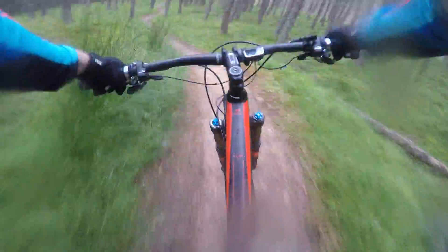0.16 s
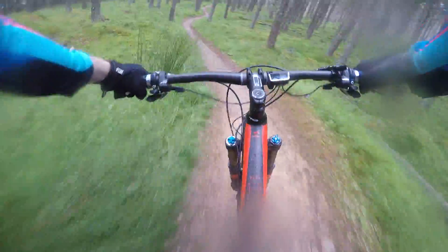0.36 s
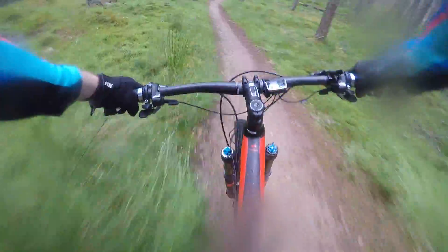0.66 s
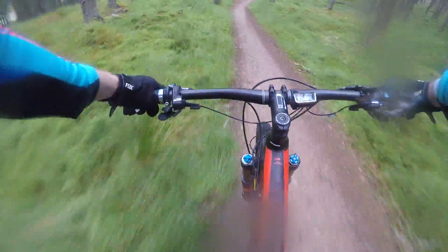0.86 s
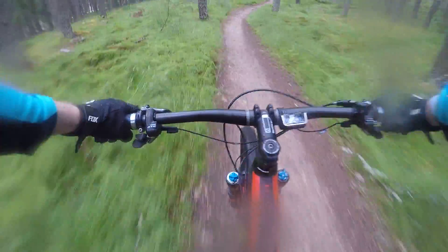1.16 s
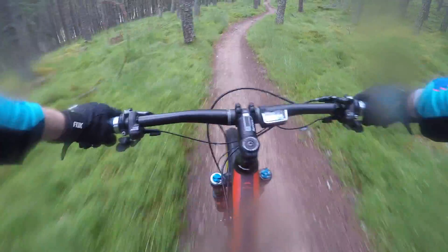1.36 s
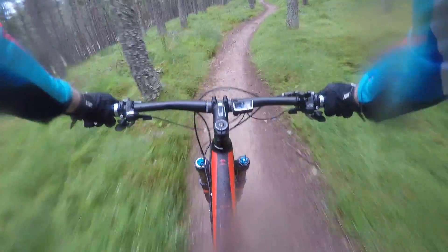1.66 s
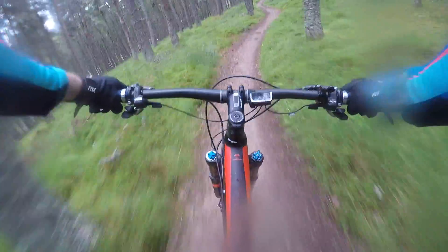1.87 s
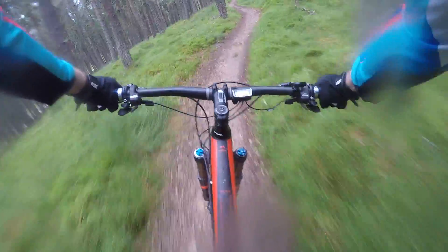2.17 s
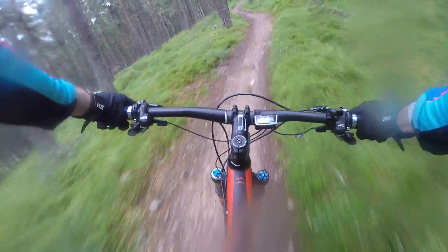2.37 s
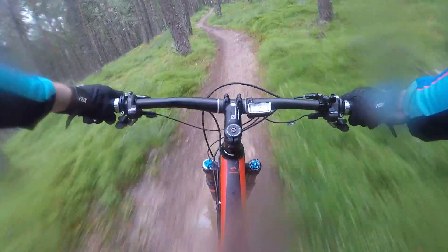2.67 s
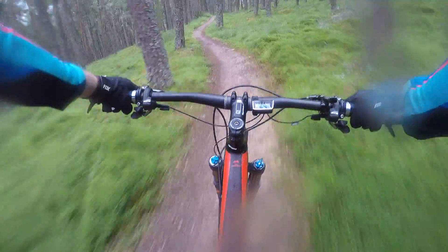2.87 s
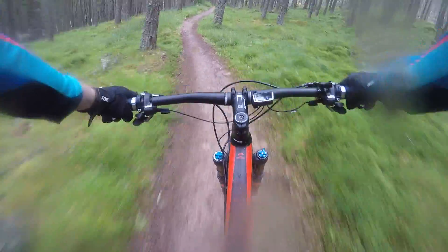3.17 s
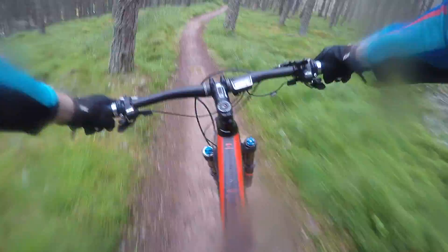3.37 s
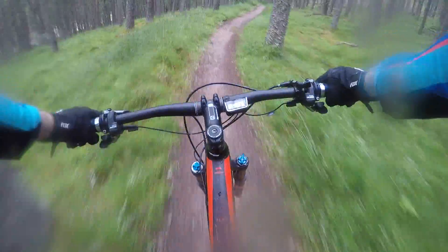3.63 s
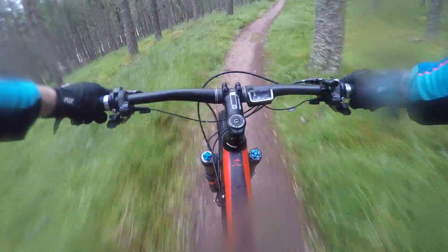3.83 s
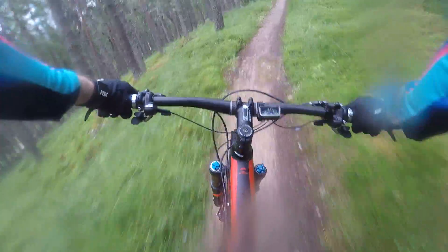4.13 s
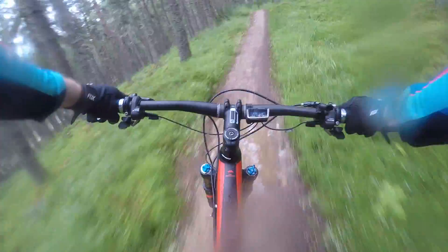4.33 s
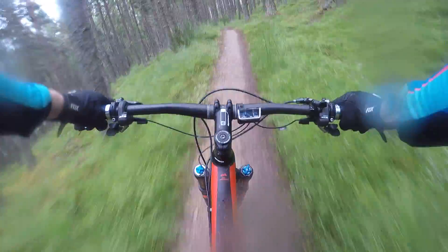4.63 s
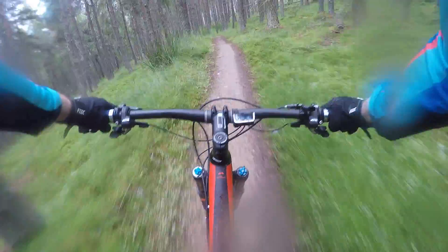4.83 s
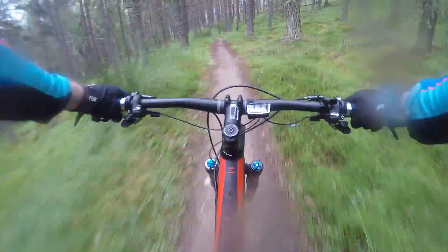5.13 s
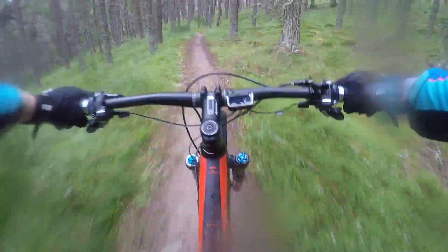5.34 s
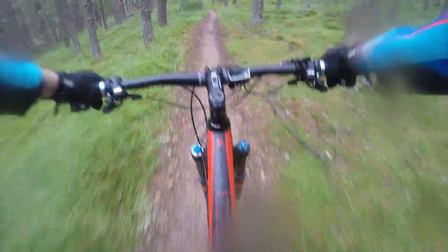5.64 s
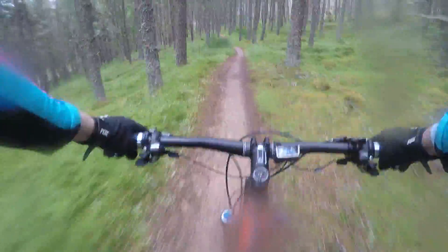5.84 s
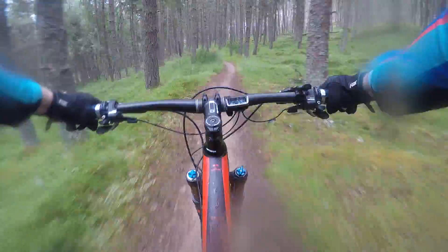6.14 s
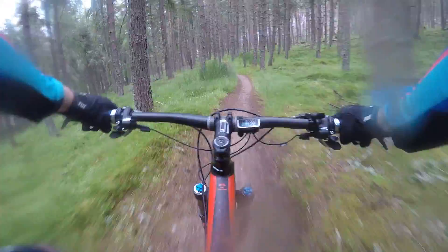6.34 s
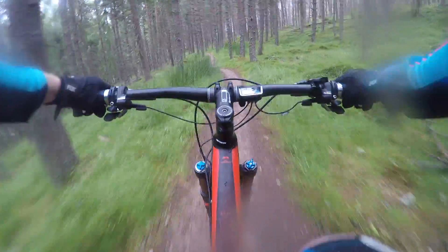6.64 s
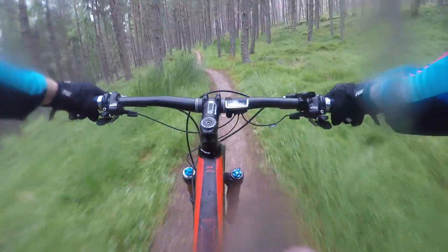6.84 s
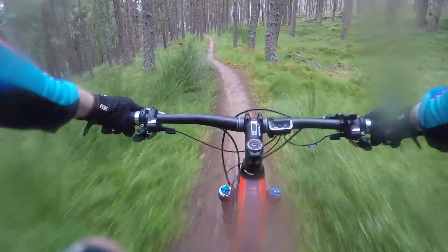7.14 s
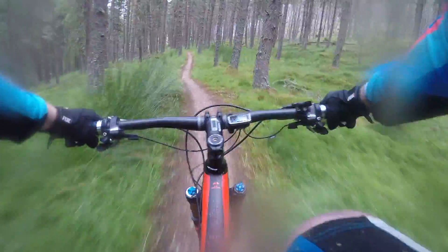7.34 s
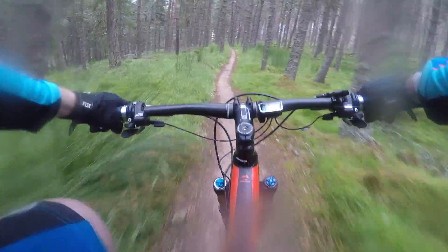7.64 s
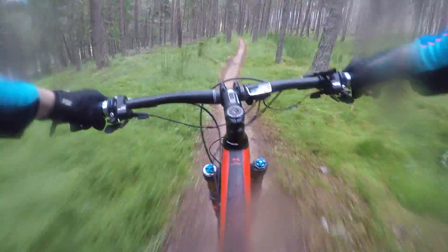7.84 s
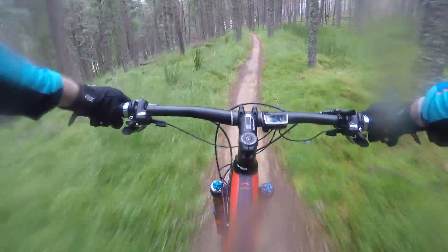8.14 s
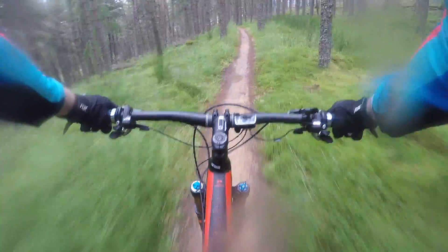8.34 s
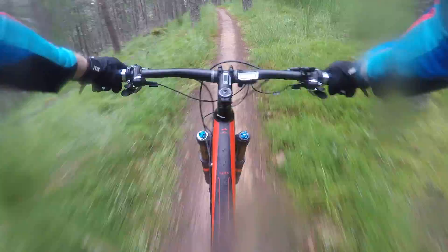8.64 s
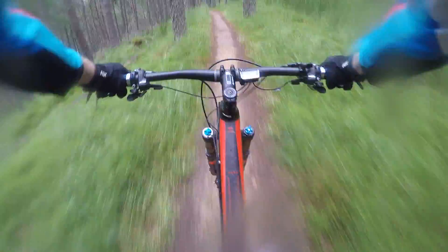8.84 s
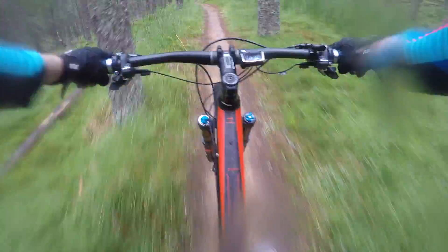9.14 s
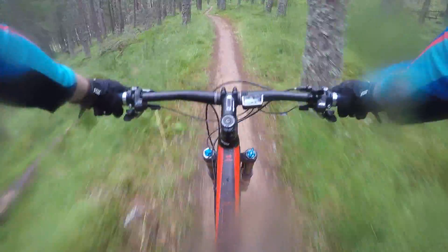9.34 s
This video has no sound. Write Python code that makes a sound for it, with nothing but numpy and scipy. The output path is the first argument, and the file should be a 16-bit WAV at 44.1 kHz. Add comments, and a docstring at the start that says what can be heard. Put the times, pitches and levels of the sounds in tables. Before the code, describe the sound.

A mountain bike races down a dirt trail, heard from the rider's chest: deep jolts and thumps, crunching tyre grit, plastic knocks and ticks.

```python
"""Low jolts and shudder, crunching grit, knocks and ticks: a mountain bike runs down a dirt trail, heard in a
closed plastic housing on the rider's chest. Jolts are swells of a wandering low sine, heave and shudder are low
noise, deep thumps and heartbeats are short falling tones. Tyre grit, fabric and stones are random clicks through
the resonances of the shell; knocks, ticks and pebbles strike its modes directly. A faint whistle enters late."""
import sys
import numpy as np
from scipy import signal
from scipy.fft import rfft, irfft
from scipy.io import wavfile
from scipy.ndimage import uniform_filter1d

SR = 44100
rng = np.random.default_rng(int(sys.argv[2]) if len(sys.argv) > 2 else 0)


def master(y):
    """Save y as 16-bit WAV."""
    cut = np.clip(np.atleast_2d(y).T, -1, 1)
    pcm = np.round(cut * 32767)  # scale
    wavfile.write(sys.argv[1], SR, pcm.astype(np.int16))


N = 418950

# Jolts over bumps. Each row: middle in seconds, peak in dB, half length of the swell in seconds.
JOLTS = [(0.232, -8, 0.04), (0.315, -13, 0.065), (0.377, -14, 0.054), (0.718, -15.5, 0.055),
         (1.107, -22.5, 0.048), (1.372, -25, 0.083), (2.312, -20.5, 0.29), (3.024, -17.5, 0.057),
         (3.474, -13, 0.058), (3.591, -10, 0.084), (4.565, -15.5, 0.13), (4.877, -20, 0.17),
         (5.21, -20.5, 0.091), (5.797, -17, 0.034), (5.918, -13, 0.096), (6.109, -17, 0.063),
         (6.826, -27, 0.25), (7.17, -12, 0.071), (7.907, -12.5, 0.098), (8.207, -14.5, 0.091),
         (8.42, -18, 0.11), (8.552, -16.5, 0.023), (8.713, -14, 0.033), (8.846, -8.5, 0.05)]
# Slow heave of the chest against the microphone. Each row: time in seconds, level in dB ahead of the strap.
HEAVE_LEVEL = [(0.0, -28.5), (0.55, -25.5), (1.0, -34), (1.55, -31.5), (1.78, -21), (2.55, -21),
               (2.76, -28.5), (3.3, -26), (3.8, -29.5), (4.3, -21), (4.8, -30.5), (5.3, -32.5), (5.44, -39),
               (5.72, -36.5), (6.3, -25.5), (6.7, -31.5), (7.4, -22), (8.3, -22.5), (8.95, -25),
               (9.33, -32.5), (9.5, -26.5)]
# Spectrum of the heave. Each row: frequency in Hz, relative density in dB per Hz.
HEAVE_SPECTRUM = [(4.7, -17), (10.0, -1), (16, 5.5), (21, 10), (27, 5.5), (32, 0.5), (43, -6), (55, -8.5),
                  (70, -45), (99, -120)]
# Louder, deeper low thumps: some fall on the pulse's beats, others between them.
# Each row: middle in seconds, peak in dB.
THUMPS = [(0.126, -24.5), (0.227, -20), (0.697, -17.5), (1.072, -23), (1.48, -21), (3.603, -24.5),
          (4.925, -24), (6.082, -25), (7.607, -18.5), (7.968, -26), (8.366, -18.5), (8.83, -23.5),
          (9.286, -30)]
# Strength of each pulse beat in turn: peak in dB.
PULSE_PEAK_DB = [-26, -25, -31, -33.5, -29, -29, -25, -26.5, -30, -34, -24.5, -26, -27, -27.5, -28.5, -26.5,
                 -26.5, -28, -32, -31, -24, -30, -27, -31]
# Tyres on dirt, levels before their wavering. Each row: time in seconds, grit through the shell in dB,
# airborne hiss in dB, roar in dB, shudder of the frame in dB.
ROLL = [(0.0, -49, -62, -51.5, -39.5), (0.18, -46.5, -63.5, -51.5, -43.5), (0.5, -50.5, -66, -57.5, -45.5),
        (1.24, -46.5, -62, -55, -44.5), (1.53, -46.5, -64.5, -54, -42.5), (2.12, -45.5, -65.5, -53, -45.5),
        (2.67, -44.5, -60.5, -53, -39.5), (3.01, -47, -64.5, -55, -46), (3.57, -46.5, -62.5, -53, -43.5),
        (3.94, -47.5, -61, -54.5, -43.5), (4.55, -45.5, -62.5, -54, -42.5), (5.64, -52, -67.5, -58.5, -45),
        (5.92, -44, -62, -55, -44.5), (6.22, -46.5, -63.5, -56, -52.5), (7.01, -50.5, -64.5, -56, -47),
        (7.62, -44, -64, -51.5, -42.5), (8.12, -48.5, -65.5, -54, -41), (8.71, -43.5, -60.5, -51, -43.5),
        (8.99, -44.5, -59, -51.5, -45), (9.5, -51, -62, -57, -39)]
# Spectrum of the frame's shudder. Each row: frequency in Hz, relative density in dB per Hz.
SHUDDER_SPECTRUM = [(24, -56), (40, -33), (54, -7.5), (160, -26.5), (210, -33.5), (350, -120)]
# Spectrum of the tyre roar. Each row: frequency in Hz, relative density in dB per Hz.
ROAR_SPECTRUM = [(88, -37), (150, -8), (210, -7), (263, -5), (329, -10), (464, -10.5), (536, -13),
                 (1160, -16), (1300, -26), (1690, -13), (2860, -120)]
# Mount on shell, ahead of KNOCK_GAIN_DB. Each row: time in seconds, nominal peak in dB, centre in Hz,
# nominal peak in the low modes in dB, loss away from the centre in dB per octave.
KNOCKS = [(0.0995, -32, 2100, -45, 10), (0.1925, -27, 3230, -49, 11), (0.2164, -22, 2260, -30, 15),
          (0.2652, -23, 2800, -54, 8), (0.3731, -27, 2230, -32, 6), (0.505, -39, 1500, -39, 6),
          (0.6724, -29, 2560, -49, 10), (0.6904, -33, 3460, -54, 12), (0.769, -22, 2240, -46, 9),
          (0.7997, -15.5, 2640, -54, 8), (0.844, -33, 2900, -56, 14), (0.877, -23, 2300, -58, 15),
          (1.161, -46, 1700, -44, 14), (1.208, -32, 1690, -55, 14), (1.2816, -26, 2760, -52, 10),
          (1.357, -21, 2420, -53, 15), (1.5084, -31, 3610, -55, 21), (1.5484, -35, 2380, -57, 17),
          (1.659, -26, 2300, -51, 16), (1.6815, -25, 2770, -29, 20), (1.982, -31, 2540, -51, 22),
          (2.2645, -26, 2660, -43, 21), (2.2837, -28, 2590, -53, 21), (2.3211, -21, 2370, -53, 4),
          (2.4902, -29, 2850, -53, 11), (2.5865, -16.5, 2310, -34, 13), (2.7445, -40, 2820, -44, 14),
          (2.798, -35, 3530, -57, 10), (2.9332, -28, 1850, -54, 18), (2.9491, -19.5, 1950, -52, 20),
          (3.3483, -42, 2030, -51, 16), (3.363, -20, 1900, -48, 14), (3.4386, -29, 2900, -52, 0),
          (3.46, -25, 2900, -48, 9), (3.486, -24, 1870, -44, 9), (3.501, -17.5, 2380, -40, -2),
          (3.5409, -31, 1670, -49, -1), (3.5698, -27, 1910, -51, 14), (3.6142, -46, 1300, -55, 7),
          (3.6294, -29, 3600, -53, 24), (3.739, -35, 2650, -51, 18), (3.7614, -27, 3530, -56, 14),
          (3.8716, -27, 3510, -60, 19), (3.8924, -26, 3600, -60, 24), (4.0073, -17.5, 2620, -51, 12),
          (4.0204, -26, 2380, -51, 9), (4.1934, -28, 1890, -51, 19), (4.225, -26, 2800, -56, 11),
          (4.334, -24, 1880, -51, 27), (4.4444, -33, 2710, -55, 14), (4.5111, -30, 1800, -53, 14),
          (4.6942, -25, 3420, -57, 29), (5.464, -40, 1800, -42, 14), (5.5947, -39, 3470, -57, 19),
          (5.6782, -28, 2660, -58, 22), (5.6848, -14.5, 2200, -52, 14), (5.7096, -25.5, 2590, -59, 12),
          (5.7565, -25.5, 2780, -39, 4), (5.8317, -26, 2300, -44, 2), (5.9254, -45, 3700, -69, 16),
          (5.962, -40, 1420, -42, 14), (5.9955, -28.5, 2860, -34, 14), (6.007, -27, 1840, -28, 8),
          (6.18, -34, 2350, -51, 8), (6.332, -26.5, 2270, -56, -1), (6.8768, -36, 1710, -57, 17),
          (7.1147, -27.5, 2830, -47, 1), (7.3195, -36, 1800, -40, 14), (7.3821, -29, 1820, -52, 14),
          (7.5022, -20, 1650, -46, 13), (7.5046, -16.5, 1980, -39, 3), (7.5895, -30, 1800, -33, 14),
          (7.614, -27, 1700, -40, 14), (7.8002, -29, 1810, -52, 20), (7.874, -26, 2740, -50, 7),
          (8.039, -33, 2800, -36, 8), (8.1723, -31, 2280, -57, 11), (8.2646, -31, 1710, -49, 8),
          (8.2945, -33, 2140, -36, 14), (8.333, -32, 1750, -47, 10), (8.405, -37, 1450, -39, 10),
          (8.7665, -16, 2300, -25, 12), (8.778, -27, 2830, -45, 12), (8.8084, -25, 2530, -46, 12),
          (8.9273, -20.5, 3780, -52, 34), (9.1716, -33.5, 2760, -52, 17)]
# Small hard ticks, ahead of TICK_GAIN_DB. Each row: time in seconds, nominal peak in dB, centre in Hz.
TICKS = [(0.1925, -39.5, 7700), (0.266, -39, 6600), (0.2992, -39, 6510), (0.419, -41, 6550),
         (0.689, -42, 7200), (0.8245, -47, 6500), (0.8778, -39, 8040), (1.3593, -45, 6650),
         (1.7779, -48, 7500), (2.2588, -50, 6850), (2.3216, -47, 7100), (2.4743, -46, 7380),
         (2.5735, -46, 6460), (2.6454, -38, 7300), (2.7317, -46, 6630), (2.756, -36, 8000),
         (2.9497, -46, 6600), (2.982, -49, 11000), (3.2979, -43.5, 7400), (3.3717, -42, 7140),
         (3.4411, -44, 7000), (3.5016, -25, 7280), (3.63, -33.5, 6300), (3.7279, -42, 6620),
         (3.8541, -46, 6480), (4.019, -40, 6750), (4.1759, -42.5, 6500), (4.5366, -46, 6810),
         (4.6603, -44, 6840), (4.8943, -44, 7300), (5.3662, -49, 9800), (5.709, -44, 6800),
         (6.005, -37, 7100), (6.8089, -44, 6570), (6.825, -40, 7250), (6.9206, -40, 8140),
         (6.9436, -42, 7080), (7.0489, -47, 7200), (7.3547, -40, 6500), (7.4235, -45, 7340),
         (7.5038, -47, 6900), (7.5792, -37, 6630), (8.1938, -46, 7140), (8.312, -52, 7340),
         (8.4307, -48, 6590), (8.739, -43, 6410), (8.8079, -41, 8040), (8.9087, -32, 6900)]
# Fabric or strap brushing the shell. Each row: start in seconds, length in seconds,
# drive of the shell in dB, drive of the treble modes in dB.
BRUSHES = [(0.68, 0.017, -50, -62), (1.667, 0.067, -48.5, -64), (2.633, 0.027, -47, -52),
           (2.718, 0.083, -45, -52), (2.828, 0.052, -48, -60), (3.361, 0.012, -47, -55),
           (3.438, 0.015, -51, -59), (3.725, 0.042, -43.5, -51.5), (3.824, 0.093, -49.5, -55),
           (4.654, 0.027, -47, -50), (6.001, 0.0094, -68, -58), (8.168, 0.057, -50, -63),
           (8.713, 0.045, -50, -67), (8.808, 0.029, -48, -56), (8.904, 0.046, -44.5, -51),
           (9.418, 0.026, -48.5, -58)]
# Main modes of the housing, at their unpadded width. Each row: frequency in Hz, width in Hz, relative level in dB.
SHELL_MODES = [(1352, 174, -4.5), (1695, 143, 3.5), (1839, 248, 4.5), (2343, 300, 3), (2821, 206, 4),
               (3505, 223, 1.5), (3796, 136, 0), (4150, 394, -9.5)]
# Heavily damped modes of a knock's first moments. Each row: frequency in Hz, unpadded width in Hz, relative dB.
CRACK_MODES = [(3050, 1200, -6), (4500, 510, 2.5)]
# Low modes of the housing. Each row: frequency in Hz, width in Hz, relative level in dB.
LOW_MODES = [(180, 120, 2), (300, 200, 1), (520, 300, 5), (814, 260, 6.6), (1210, 270, 8.5)]
# Treble modes of the housing. Each row: frequency in Hz, width in Hz, relative level in dB.
TREBLE_MODES = [(4610, 300, 7), (5290, 1080, 2), (6750, 770, 3), (7220, 720, 1.5), (8340, 770, -2.5),
                (9850, 850, -3.5), (12660, 1500, -5), (14900, 1400, -12.5)]
# Whistling bands, passed twice. Each row: frequency in Hz, width per pass in Hz, relative level per pass in dB.
WHISTLE_BANDS = [(5550, 270, -1.4), (6470, 270, -0.6)]

CHEST_HZ, CHEST_WANDER_SHARE = 22, 0.2   # jolts set the chest ringing
STRAP_HZ = 47   # the strap passes only slow heave
THUMP_HZ = 47
PULSE_START_S, PULSE_PERIOD_S, PULSE_QUICKENS_S = 0.309, 0.3875, 0.00019
PULSE_HZ, PULSE_SCATTER_OCT = 72.3, 0.08
LUMPS_DB, LUMPS_HZ, ROAR_FOLLOWS_SHARE = 2.0, 13.5, 0.3   # wheels meet the ground unevenly
PATCHES_DB, PATCHES_HZ = 1.02, 21   # patches of coarser and finer dirt
KNOCK_GAIN_DB, TICK_GAIN_DB = -5.5, 6.0
PADDED_WIDTH_RATIO = 2.97   # a padded contact widens each mode and steepens its skirts
SOFT_LOW_HZ, SOFT_HIGH_HZ = 110, 5160   # the mount's blunt contact
TAIL_S = 0.0073   # time constant of the noise after a knock or tick
KNOCK_TAIL_DB, TICK_TAIL_DB = -23.5, -21   # relative to the table peaks, ahead of the modes
FAINT_TICKS, FAINT_TICK_DB = 45, -53.5   # count, mean peak ahead of TICK_GAIN_DB
FAINT_TICK_HZ, FAINT_TICK_SPREAD_OCT = 8100, 0.099
BRUSH_RISE_SHARE, BRUSH_SAG_DB, BRUSH_TAIL_S = 0.33, 2, 0.019   # share of the length, loss over it, time constant
PEBBLES, PEBBLE_DB, PEBBLE_FOCUS_DB_PER_OCT = 260, -42, 26   # count, mean peak, loss away from the centre
PEBBLE_LOW_HZ, PEBBLE_HIGH_HZ = 1600, 3950
WHISTLE_START_S, WHISTLE_RISE_S, WHISTLE_DB, WHISTLE_FADE_DB_PER_S = 8.99, 0.1, -63, 12
STOPBAND_HZ = 15810


def from_db(db):
    """Decibels to gain."""
    return 10 ** (np.asarray(db) / 20)


def rms_one(x):
    """Scaled to rms 1."""
    return x / np.sqrt(np.mean(x ** 2) + 1e-20)


def in_time(rows):
    """Each column after the first, interpolated to a value per sample."""
    s, *columns = np.transpose(rows)
    return [np.interp(np.arange(N) / SR, s, column) for column in columns]


def drift(rate_hz):
    """Slow random wander of rms 1: noise through a double one-pole low-pass at every 40th sample."""
    r = np.exp(-2 * np.pi * rate_hz * 40 / SR)
    noise = rng.standard_normal(N // 40 + 2002)
    slow = signal.lfilter([1], [1, -2 * r, r * r], noise)[2000:]   # settled part
    return np.interp(np.arange(N) / 40, np.arange(len(slow)), rms_one(slow))


def coloured_noise(spectrum, even_s):
    """Noise of rms 1 with the given spectrum; its own swells slower than even_s are levelled out."""
    hz, level_db = np.transpose(spectrum)
    grid_hz = np.maximum(np.fft.rfftfreq(N, 1 / SR), 1)
    gain = from_db(np.interp(np.log(grid_hz), np.log(hz), level_db))
    x = irfft(rfft(rng.standard_normal(N)) * gain, N)
    span = int(even_s * SR)
    power = uniform_filter1d(uniform_filter1d(x ** 2, span), span)
    return rms_one(x / np.sqrt(power + 1e-20))


def resonance(x, hz, width_hz):
    """A two-pole resonance with gain 1 on top."""
    r = np.exp(-np.pi * width_hz / SR)
    numerator = np.array([1, 0, -1]) * (1 - r * r) / 2
    return signal.lfilter(numerator, [1, -2 * r * np.cos(2 * np.pi * hz / SR), r * r], x)


def through(modes, x, flicker_db=0):
    """Parallel resonances with alternating signs; each may flicker on its own."""
    out = 0
    for k, (hz, width_hz, db) in enumerate(modes):
        wander_db = flicker_db * drift(23.5) if flicker_db else 0
        out = out + (-1) ** k * from_db(db + wander_db) * resonance(x, hz, width_hz)
    return out


def grains(per_s, spread_db, clumping_db, clumps_hz):
    """Random clicks of uneven size and sign whose level wanders; rms 1."""
    sizes = from_db(spread_db * np.minimum(rng.exponential(1, N), 5)) * rng.choice([-1, 1], N)
    born = rng.random(N) < per_s / SR
    return rms_one(sizes * born * from_db(clumping_db * drift(clumps_hz)))


def blows(s, peak_db, centre_hz, modes, focus_db, chatter_s, fade_db, count, padded=False):
    """Each blow is a short rattle of contacts; modes near its centre pitch are struck hardest."""
    scatter_db = 2.5 * rng.standard_normal((len(s), len(modes), count))
    lags_s = chatter_s * np.arange(count) * rng.uniform(0.513, 1.5, (len(s), count))
    lags_s = np.round(lags_s * centre_hz[:, None]) / centre_hz[:, None]   # contacts fall in step with the ring
    at = np.minimum(((s[:, None] + lags_s) * SR).astype(int), N - 1)
    hz, width_hz, db = np.transpose(modes)
    width_hz = width_hz * (PADDED_WIDTH_RATIO if padded else 1)
    octaves_off = np.abs(np.log2(hz / centre_hz[:, None]))
    share = from_db(db - focus_db * octaves_off)
    share /= np.sqrt(np.sum(share ** 2, axis=1, keepdims=True))
    out = np.zeros(N)
    for k in range(len(modes)):
        clicks = np.full(N, 1e-18)
        contact_db = peak_db[:, None] + scatter_db[:, k] - fade_db * lags_s / chatter_s
        np.add.at(clicks, at, share[:, k, None] * from_db(contact_db))
        # a unit click rings at height 1
        ring = resonance(clicks, hz[k], width_hz[k]) * SR / (2 * np.pi * width_hz[k])
        if padded:
            ring = np.e * resonance(ring, hz[k], width_hz[k])
        out += (-1) ** k * ring
    return out


def faint(count, db):
    """Times and peaks of faint blows scattered evenly at random."""
    draw = rng.random((count, 2))
    return draw[:, 0] * N / SR, db + 3.7 * (draw[:, 1] - 0.5)


def jolts():
    """Each jolt is a smooth swell of the chest's ring, a low sine of wandering pitch."""
    swells = np.zeros(N)
    for s, db, half_s in JOLTS:
        swell = np.hanning(int(2 * half_s * SR))
        start = int((s - half_s) * SR)
        swells[start:start + len(swell)] += from_db(db) * swell
    pitch_hz = CHEST_HZ * (1 + CHEST_WANDER_SHARE * drift(2.91))
    return swells * np.sin(2 * np.pi * np.cumsum(pitch_hz) / SR)


def heave():
    """The chest heaves against the microphone: low noise, low-passed by the strap."""
    steady = from_db(in_time(HEAVE_LEVEL)[0]) * coloured_noise(HEAVE_SPECTRUM, even_s=0.085)
    return signal.sosfilt(signal.butter(2, STRAP_HZ, fs=SR, output="sos"), steady)


def pulse():
    """Heartbeats at a slowly quickening rate, as rows of seconds, peak dB and pitch in Hz."""
    beat = np.arange(len(PULSE_PEAK_DB))
    s = PULSE_START_S + PULSE_PERIOD_S * beat - PULSE_QUICKENS_S * beat ** 2
    pitch_hz = PULSE_HZ * 2 ** (PULSE_SCATTER_OCT * rng.standard_normal(len(beat)))
    return list(zip(s, PULSE_PEAK_DB, pitch_hz))


def thumps(cycles):
    """Deep thumps and heartbeats: a few cycles of a falling low tone under a smooth swell."""
    out = np.zeros(N)
    rows = pulse() + [(s, db, THUMP_HZ) for s, db in THUMPS]
    phases = rng.uniform(0, 2 * np.pi, len(rows))
    for (s, db, hz), phase in zip(rows, phases):
        turn = np.linspace(-0.5, 0.5, int(cycles / hz * SR))
        tone = np.sin(2 * np.pi * cycles * (turn - 0.16 * turn ** 2) + phase)
        start = int(s * SR) - len(turn) // 2
        out[start:start + len(turn)] += from_db(db) * tone * np.cos(np.pi * turn) ** 2
    return out


def shudder(level_db, lumps_db):
    """The frame shudders as the wheels meet uneven ground: low noise of lumpy level."""
    return from_db(level_db + lumps_db) * coloured_noise(SHUDDER_SPECTRUM, even_s=0.38)


def roar(level_db, patches_db, lumps_db):
    """Tyre roar: noise that follows the dirt, partly the lumps, and flutters by itself."""
    flutter_db = 1.32 * drift(26)
    total_db = level_db + patches_db + ROAR_FOLLOWS_SHARE * lumps_db + flutter_db
    return from_db(total_db) * coloured_noise(ROAR_SPECTRUM, even_s=0.053)


def knocks():
    """The mount knocks on the shell and on its low modes; the blunt contact trims both ends."""
    s, peak_db, centre_hz, low_db, focus_db = np.transpose(KNOCKS)
    out = blows(s, peak_db, centre_hz, SHELL_MODES + CRACK_MODES, focus_db[:, None],
                chatter_s=0.0011, fade_db=4.5, count=4, padded=True)
    out += blows(s, low_db, centre_hz, LOW_MODES, focus_db=8.5, chatter_s=0.0017, fade_db=0.0, count=2)
    out = signal.sosfilt(signal.butter(2, SOFT_LOW_HZ, "high", fs=SR, output="sos"), out)
    out = signal.sosfilt(signal.butter(5, SOFT_HIGH_HZ, fs=SR, output="sos"), out)
    return from_db(KNOCK_GAIN_DB) * out


def ticks():
    """Hard ticks, listed and faint random ones, ring the treble modes above the lowest."""
    s, peak_db = faint(FAINT_TICKS, FAINT_TICK_DB)
    centre_hz = FAINT_TICK_HZ * 2 ** (FAINT_TICK_SPREAD_OCT * rng.standard_normal(len(s)))
    s, peak_db, centre_hz = np.hstack([np.transpose(TICKS), [s, peak_db, centre_hz]])
    out = blows(s, peak_db, centre_hz, TREBLE_MODES[1:], focus_db=1.8, chatter_s=0.00094, fade_db=5.0, count=4)
    return from_db(TICK_GAIN_DB) * out


def tail_envelope(events, under_db):
    """Exponential decay after each blow, for the buzz or hiss that trails it."""
    s, peak_db = np.transpose(events)[:2]
    kicks = np.zeros(N)
    kicks[(s * SR).astype(int)] = from_db(peak_db + under_db)
    return signal.lfilter([1], [1, -np.exp(-1 / (TAIL_S * SR))], kicks + 1e-18)


def brush_envelopes():
    """Each brush rises quickly, sags while it lasts and trails off; rows for shell and treble."""
    out = np.zeros((2, N))
    for s, length_s, *levels_db in BRUSHES:
        start = int(s * SR)
        age_s = np.arange(N - start)[:SR // 4] / SR
        rise = np.sin(np.pi / 2 * np.minimum(age_s / (BRUSH_RISE_SHARE * length_s), 1))
        sag = from_db(-BRUSH_SAG_DB * np.minimum(age_s / length_s, 1))
        tail = np.exp(-np.maximum(age_s - length_s, 0) / BRUSH_TAIL_S)
        out[:, start:start + len(age_s)] += from_db(levels_db)[:, None] * rise * sag * tail
    return out


def fabric():
    """Rubbing fabric: dense clicks under the brush envelopes; rows for shell and treble."""
    out = brush_envelopes() * grains(2200.0, spread_db=2.0, clumping_db=-0.5, clumps_hz=65.0)
    out[0] = resonance(out[0], hz=3650, width_hz=1600) * 2.76   # light rubbing favours the upper modes
    return out


def housing(modes, drive, flicker_db):
    """The drive rings the flickering modes, scaled so that steady white noise would keep its level."""
    unit = rng.standard_normal(N)
    return through(modes, drive, flicker_db) / np.std(through(modes, unit))


def grit_and_fabric(grit_db, hiss_db, patches_db):
    """Grit, stones, fabric and blow tails drive the shell modes; with hiss they drive the treble modes."""
    grit = grains(4500.0, spread_db=3.1, clumping_db=0.6, clumps_hz=60.0)
    stones = grains(160.0, spread_db=0.5, clumping_db=-0.5, clumps_hz=20.0)   # the same in shell and air
    fabric_body, fabric_air = fabric()
    body = from_db(grit_db + patches_db) * (grit + from_db(-14.5) * stones)
    body += fabric_body + tail_envelope(KNOCKS, KNOCK_TAIL_DB) * grit
    hiss = 0.14 * grit + 0.72 * rng.standard_normal(N) + from_db(-8.5) * stones
    air = from_db(hiss_db + patches_db) * hiss
    air += fabric_air + tail_envelope(TICKS, TICK_TAIL_DB) * grit
    return housing(SHELL_MODES, body, flicker_db=1.36) + housing(TREBLE_MODES, air, flicker_db=2.0)


def pebbles():
    """Small stones flung against the bike at random, each ringing mainly one part of the shell."""
    s, peak_db = faint(PEBBLES, PEBBLE_DB)
    centre_hz = PEBBLE_LOW_HZ * (PEBBLE_HIGH_HZ / PEBBLE_LOW_HZ) ** rng.random(len(s))
    return blows(s, peak_db, centre_hz, SHELL_MODES, PEBBLE_FOCUS_DB_PER_OCT,
                 chatter_s=0.0012, fade_db=5.5, count=2, padded=True)


def whistle():
    """Noise twice through narrow bands, rising once and then fading."""
    noise = rng.standard_normal(N)
    bands = through(WHISTLE_BANDS, through(WHISTLE_BANDS, noise))
    age_s = np.arange(N) / SR - WHISTLE_START_S
    fade_db = -WHISTLE_FADE_DB_PER_S * np.maximum(age_s - WHISTLE_RISE_S, 0)
    return from_db(WHISTLE_DB + fade_db) * np.clip(age_s / WHISTLE_RISE_S, 0, 1) * rms_one(bands)


def scene():
    """Shaking, rolling, blows, brushes and whistle add up at the microphone."""
    grit_db, hiss_db, roar_db, shudder_db = in_time(ROLL)
    patches_db = PATCHES_DB * drift(PATCHES_HZ)
    lumps_db = LUMPS_DB * drift(LUMPS_HZ)
    mix = jolts() + heave() + thumps(cycles=2.8)
    mix += shudder(shudder_db, lumps_db) + roar(roar_db, patches_db, lumps_db)
    mix += grit_and_fabric(grit_db, hiss_db, patches_db)
    mix += knocks() + ticks() + pebbles() + whistle()
    return mix[None]


def record(dry):
    """A steep low-pass cuts the top."""
    return signal.sosfilt(signal.cheby2(14, 50, STOPBAND_HZ, fs=SR, output="sos"), dry)


dry = scene()
out = record(dry)
master(out)
```